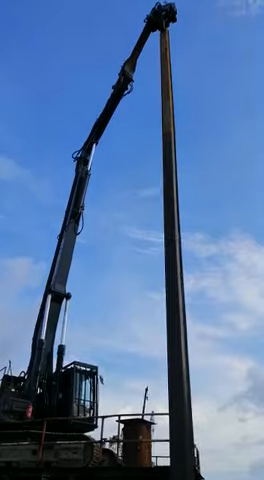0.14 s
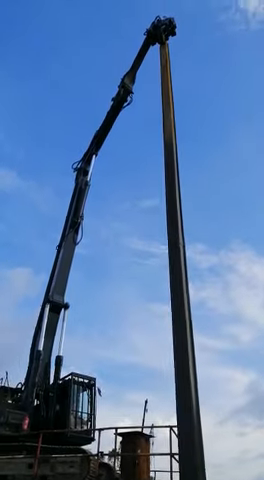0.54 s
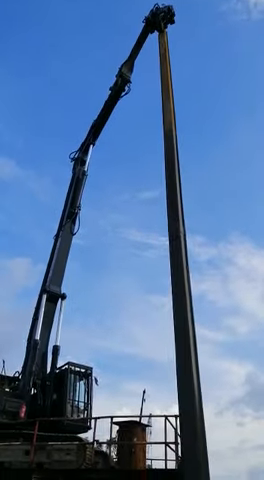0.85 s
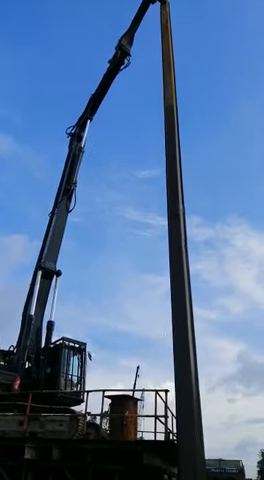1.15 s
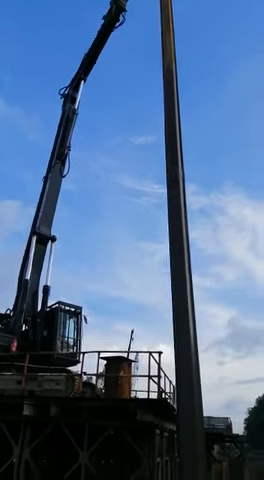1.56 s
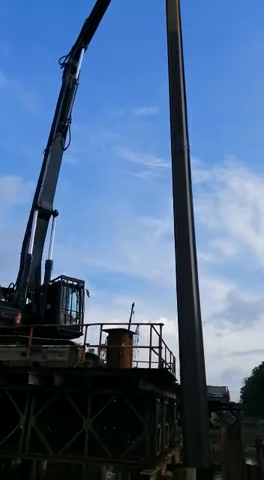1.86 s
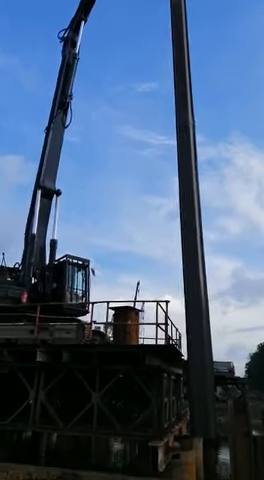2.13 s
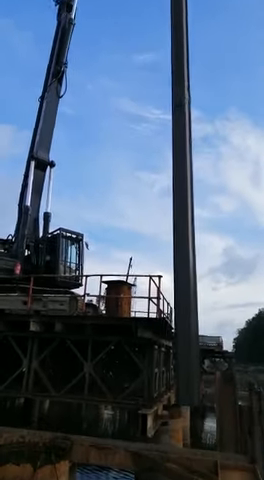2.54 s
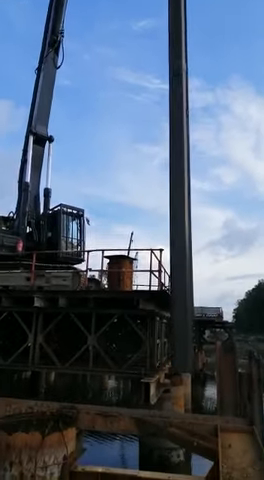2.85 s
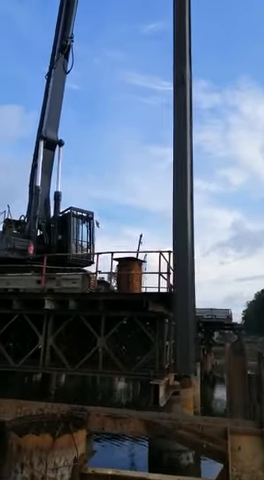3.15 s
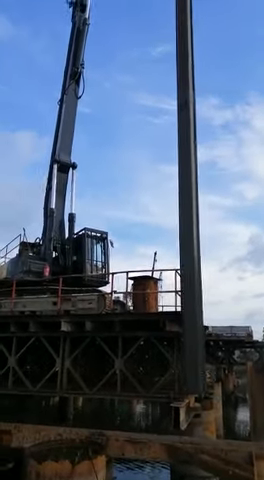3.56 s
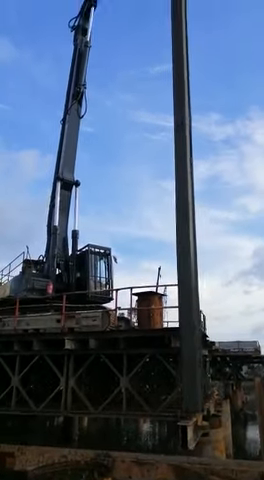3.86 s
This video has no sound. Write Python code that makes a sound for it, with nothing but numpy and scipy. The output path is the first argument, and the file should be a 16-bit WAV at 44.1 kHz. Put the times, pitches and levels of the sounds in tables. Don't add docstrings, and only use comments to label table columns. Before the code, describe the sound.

After a brief silence, a steady engine drone starts abruptly, with low rumble, rushing cooling air and thin hydraulic whistles. Small hiss spits follow, the pump whine dips, and pile hum grows. Open waterside site, handheld stereo phone.

```python
import sys
import numpy as np
from scipy import signal
from scipy.fft import rfft, irfft
from scipy.io import wavfile
from scipy.ndimage import uniform_filter1d, map_coordinates

SR = 44100
rng = np.random.default_rng(int(sys.argv[2]) if len(sys.argv) > 2 else 0)


def put_to_file(sound):
    columns = np.atleast_2d(sound).T
    safe = np.clip(columns, -1, 1)
    whole_steps = np.round(safe * 32767)
    wavfile.write(sys.argv[1], SR, whole_steps.astype(np.int16))


def linear_from_db(decibels):
    return 10 ** (np.asarray(decibels, float) / 20)


N = 176400
PORT_LAG_S = 0.00034


def in_time(rows):
    s, *columns = np.transpose(rows)
    return [np.interp(np.arange(N) / SR, s, c) for c in columns]


def drift(rate_hz):
    r = np.exp(-2 * np.pi * rate_hz * 40 / SR)
    slow = signal.lfilter([1], [1, -2 * r, r * r], rng.standard_normal(N // 40 + 2002))[2000:]
    return np.interp(np.arange(N) / 40, np.arange(len(slow)), slow / slow.std())


def pan(db):
    return linear_from_db(np.array([db / 2, -db / 2])).reshape(2, -1)


def tones(turns, orders, waver_db):
    out = 0
    for k, db in orders:
        level = np.sqrt(2) * linear_from_db(db + waver_db * drift(6.1))
        out = out + level * np.sin(2 * np.pi * (k * turns + rng.random()))
    return out


# f/Hz, left-right likeness
ALIKE = [(60, .94), (250, .93), (630, .76), (1200, .58), (2500, .5), (4200, .5), (6000, .6), (12000, .4)]


def air(points, patchy_db, gust_db, count):
    p = np.array(points, float)
    hz = np.fft.rfftfreq(N, 1 / SR) + 1e-3
    octaves, knots = np.log2(hz), np.log2(p[:, 0])
    outside = -30 * (np.maximum(knots[0] - octaves, 0) + np.maximum(octaves - knots[-1], 0))
    shape = linear_from_db(np.array([np.interp(octaves, knots, p[:, c]) for c in (1, -1)]) + outside)
    alike_hz, alike = np.transpose(ALIKE)
    alike = np.clip(np.interp(octaves, np.log2(alike_hz), alike), -.99, .99)
    mid, side = rfft(rng.standard_normal((2, N)))
    whole = shape * (np.sqrt(1 + alike) * mid + np.sqrt(1 - alike) * side * [[1], [-1]])
    whole[1] *= np.exp(-2j * np.pi * PORT_LAG_S * np.maximum(hz - 2000, 0))
    centres = np.linspace(knots[0], knots[-1], count)
    together, out = drift(12.0), 0
    for k in range(count):
        share = np.interp(octaves, centres, np.arange(count) == k)
        out = out + irfft(whole * share, N) * linear_from_db(patchy_db * drift(3.2) + gust_db * together)
    return out / np.sqrt(np.mean(out ** 2))


def resonances(rows):
    out, t = 0, np.arange(N) / SR - 2
    for hz, width, db, pan_db, growth_db in rows:
        r, x = np.exp(-np.pi * width / SR), rng.standard_normal((2, N))
        x[1] = 0.65 * np.roll(x[0], int(PORT_LAG_S * SR)) + 0.8 * x[1]
        for _ in range(2):
            x = signal.lfilter([1, 0, -1], [1, -2 * r * np.cos(2 * np.pi * hz / SR), r * r], x)
        out = out + x / x.std() * linear_from_db(db + growth_db * t + 1.8 * drift(7.5)) * pan(pan_db)
    return out


# multiple of the cycle, level/dB
ENGINE_ORDERS = [(4, -40), (6, -11.5), (7, -28), (10, -15.5), (12, -19.5), (13, -21.5), (16, -18),
                 (20, -18), (21, -16.5), (22, -25.5), (48, -24.5), (54, -21.5)]
# t/s, level/dB
ENGINE_FACING = [(.4, 0), (.9, 3.5), (1.5, 1), (2.6, -3.5), (3.1, -3.5), (4, -12.5)]


def engine(level_db):
    cycles = 15.475 * np.arange(N) / SR
    return linear_from_db(level_db + in_time(ENGINE_FACING)[0]) * tones(cycles, ENGINE_ORDERS, waver_db=1.5)


# multiple of the shaft, level/dB
HAMMER_ORDERS = [(1, -17.5), (2, -6), (4, 0.5), (6, -12), (8, -15), (10, -15)]
# t/s, level/dB
PILE_GRIP = [(.4, -47), (1.3, -45.5), (2.5, -37.5), (2.9, -37), (3.4, -32.5), (3.65, -41.5), (4, -33)]
# t/s, level/dB
ELEVENTH_RING = [(.4, -43), (1.3, -46), (1.5, -50), (2.9, -45.5), (3.3, -42.5), (3.55, -46.5), (4, -52)]


def hammer():
    turns = np.cumsum(32.6 * (1 + 0.00358 * drift(1.177))) / SR
    hum = linear_from_db(in_time(PILE_GRIP)[0]) * tones(turns, HAMMER_ORDERS, waver_db=1.5)
    ring = tones(turns, [(11, in_time(ELEVENTH_RING)[0])], waver_db=1.5)
    return hum + ring


# t/s, f/Hz, level/dB, fundamental against the rest level/dB
PUMP_RUN = [(.4, 222.8, -41, 1), (1.1, 222.2, -32, -6.5), (1.5, 222.6, -32, -0.5), (2.2, 223, -34, -1.5),
            (2.7, 222.8, -31.5, 1.5), (2.95, 221.8, -25, -1), (3.08, 212, -23, -9),
            (3.2, 200.9, -24.5, -3.5), (3.4, 194, -31.5, -2.5), (3.5, 192, -45, 0), (3.75, 196.5, -43, 0),
            (3.9, 200.8, -37, -1), (4, 198, -37, -2)]
# multiple, level/dB before the load sags, level/dB after
PUMP_HARMONICS = [(2, -4, -26.5), (3, -14, -22.5), (4, -16.5, -34), (5, -21, -25), (9, -20.5, -34)]


def pump():
    hz, db, first_db = in_time(PUMP_RUN)
    sag = np.clip((hz.max() - hz) / 6, 0, 1)
    upper = [(k, before + (after - before) * sag) for k, before, after in PUMP_HARMONICS]
    return linear_from_db(db) * tones(np.cumsum(hz) / SR, [(1, first_db)] + upper, waver_db=1.26)


# f/Hz, level/dB per Hz
RUMBLE_COLOUR = [(60, -11.5), (75, -4), (95, -1.5), (150, -4.5), (230, 1), (290, -7), (400, -9.5),
                 (560, -17)]


def rumble(level_db):
    return linear_from_db(level_db - 2.5) * air(RUMBLE_COLOUR, patchy_db=1.36, gust_db=0.43, count=8) * pan(-2.5)


# f/Hz, left level/dB, right level/dB
ROAR_COLOUR = [(477, -9, -11.5), (577, -4, -4), (833, -7, 3), (1093, -7.5, -6), (1490, -5.5, -3),
               (1666, -17.5, -8), (2290, -12, -4), (3000, -15, -10.5)]
# f/Hz, left level/dB, right level/dB
WHIR_COLOUR = [(3200, -3, -1), (3530, 5, -7), (4100, -1, -4), (4700, -4, -3)]


def fan(roar_db):
    roar = linear_from_db(roar_db + 1) * air(ROAR_COLOUR, patchy_db=0.85, gust_db=0.0, count=8)
    usual = roar_db.mean()
    fade_db = 2.2 * (np.arange(N) / SR - 1.5)
    whir_db = usual + 0.76 * (roar_db - usual) - 17 - fade_db
    return roar + linear_from_db(whir_db) * air(WHIR_COLOUR, patchy_db=2.5, gust_db=1.0, count=3)


# f/Hz, left level/dB, right level/dB
HISS_COLOUR = [(4540, -8.5, -7.5), (5150, -8.5, -4), (5500, -8.5, 1), (6300, -12.5, -6), (6600, -10, -6.5),
               (7280, -19.5, -9.5), (8030, -14, -15)]
# f/Hz, left level/dB, right level/dB
FIZZ_COLOUR = [(8900, -12, -10), (9200, -7, -7), (10000, -5, -8), (10760, 1.5, -8), (12100, 1, -16),
               (12800, -15, -14), (13700, -9, -11), (14900, -20, -17)]


def hiss():
    body = linear_from_db(2) * air(HISS_COLOUR, patchy_db=1.07, gust_db=0.26, count=8)
    return body + linear_from_db(-11.5) * air(FIZZ_COLOUR, patchy_db=1.0, gust_db=0.5, count=12)


# f/Hz, width/Hz, level/dB under the oil flow, left-right level/dB, growth/dB per s
STEADY_WHISTLES = [(1422, 24, -12, -12, 0.5), (1545, 26, -7.5, -11, 0.5), (2140, 6.3, -5.5, -4, -4),
                   (3535, 180, -10.5, 7, 2.5), (6900, 850, -10, -2, -3.5), (8070, 300, -22, -5, 1),
                   (10700, 160, -27, 8, -1), (11140, 45, -28, 16, -3), (12030, 70, -31, 18, -4)]


def whistles():
    return resonances(STEADY_WHISTLES)


# f/Hz, level/dB per Hz
BREEZE_COLOUR = [(28, -12), (34, -6), (45, 11), (70, -3)]
# t/s, level/dB
WIND_GUSTS = [(.45, -68), (1.0, -58), (1.3, -52), (1.6, -55), (1.95, -44), (2.4, -50), (3.0, -56),
              (3.6, -48), (4, -49)]


def breeze():
    return linear_from_db(6.5 + in_time(WIND_GUSTS)[0]) * air(BREEZE_COLOUR, patchy_db=2, gust_db=0.7, count=2)


# t/s, level/dB above the steady hiss
RELIEF_SPITS = [
    (1.504, 4),
    (2.09, 1.5),
    (2.215, 5),
    (2.554, 5),
    (2.741, 1),
    (2.964, 2),
    (3.15, 1.5),
]


def spits():
    t, fade_s = np.arange(N) / SR, 0.028
    return sum(db * (t >= s) * np.exp(-np.maximum(t - s, 0) / fade_s) for s, db in RELIEF_SPITS)


# f/Hz, width/Hz, level/dB, left-right level/dB, growth/dB per s
VALVE_WHISTLES = [
    (5130, 30, -19, -6, -.5),
    (5640, 24, -9.5, -9, 1.3),
    (5700, 450, -10, -11, .5),
]


def valve():
    opens_s, rise_s, shut_db = 2, .04, -15
    shut = np.clip((opens_s - np.arange(N) / SR) / rise_s, 0, 1)
    return linear_from_db(shut_db * shut) * resonances(VALVE_WHISTLES)


# t/s, engine level/dB, fan level/dB, oil level/dB, left-right level/dB
MACHINE_DRIVE = [(0.43, -26.5, -36, -45.5, -1), (0.49, -29, -36, -47, -1.5), (1.0, -32, -40, -51, -2),
                 (1.33, -27, -36, -47.5, -6.5), (1.44, -24, -35, -46.5, -4),
                 (1.58, -25.5, -32, -44.5, -3.5), (1.74, -23, -32, -43, -3), (2.34, -21.5, -31.5, -44, -4),
                 (2.36, -30, -31.5, -44, -3.5), (2.43, -22, -32.5, -46.5, -5),
                 (2.69, -24.5, -32.5, -44.5, -4), (2.91, -24.5, -34, -44, -4.5),
                 (3.37, -24.5, -34.5, -44.5, -4), (3.58, -26.5, -36, -43.5, -6.5),
                 (3.68, -24, -36, -46, -5), (3.75, -25.5, -37, -45.5, -7.5), (3.95, -29, -36.5, -45, -4.5),
                 (4.0, -27, -36, -47, -4)]


def scene():
    low_db, roar_db, oil_db, turn_db = in_time(MACHINE_DRIVE)
    turn_db = turn_db - turn_db.mean()
    drone = engine(low_db) + hammer() + pump()
    echo = linear_from_db(-11) * np.roll(drone, int(0.00231 * SR))
    drone = np.array([drone, drone + echo]) * pan(-2)
    low = (drone + rumble(low_db)) * pan(0.051 * turn_db)
    roar = fan(roar_db)
    oil = linear_from_db(oil_db) * (linear_from_db(spits()) * hiss() + whistles() + valve())
    left, right = (roar + oil) * pan(turn_db)
    lag = .00009 * (np.arange(N) - N / 2)
    right = map_coordinates(right, [np.arange(N) - lag], order=5, mode="nearest")
    return low + breeze() + np.array([left, right])


# f/Hz, share
TREBLE_GATE = [(3000, 0), (4000, .5), (5000, .2), (6500, .25), (8400, .7), (11000, .55), (12800, .8),
               (15000, .7)]


def gate(x):
    hz, _, cells = signal.stft(x, SR, nperseg=1920)
    level = uniform_filter1d(abs(cells) ** 2, size=3, axis=1)
    share = np.interp(hz, *np.transpose(TREBLE_GATE))[:, None]
    keep = level >= share * uniform_filter1d(level, size=41, axis=1)
    return signal.istft(cells * keep, SR, nperseg=1920)[1][:, :N]


def low_pass(x):
    return signal.sosfilt(signal.butter(12, 14990, fs=SR, output="sos"), x)


def record(dry):
    start_s, open_s, lead_s = 0.4206, .0015, 0.0075
    since = np.arange(N) / SR - start_s
    dull = signal.sosfilt(signal.butter(2, [90, 500], "band", fs=SR, output="sos"), dry)
    lead = linear_from_db(-14.5) * np.exp(np.minimum(since, 0) / lead_s) * (since > -3.2 * lead_s) * dull
    opened = np.clip(since / open_s, 0, 1)
    return low_pass(lead * (1 - opened) + gate(dry) * opened)


dry = scene()
out = record(dry)
put_to_file(out)
```